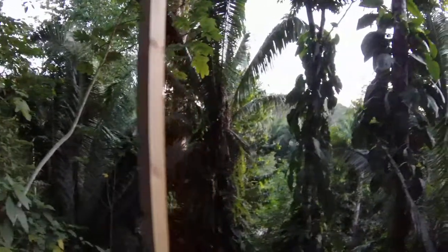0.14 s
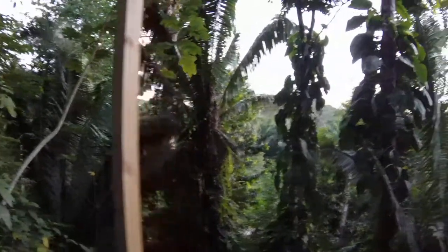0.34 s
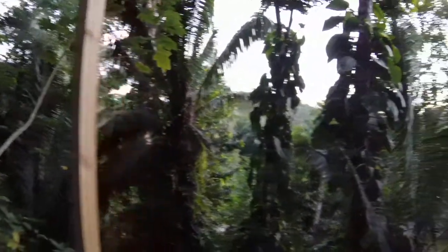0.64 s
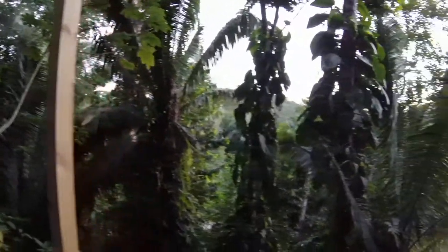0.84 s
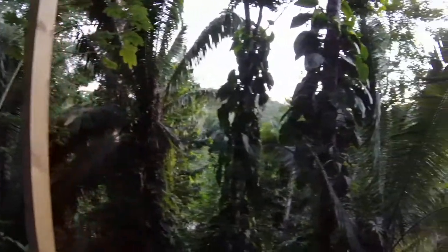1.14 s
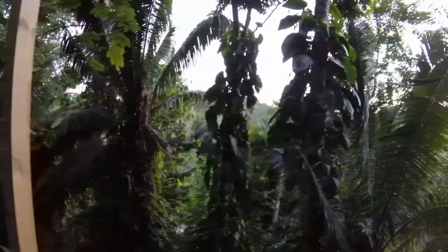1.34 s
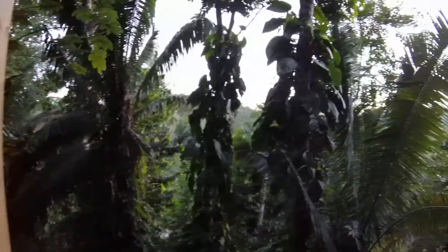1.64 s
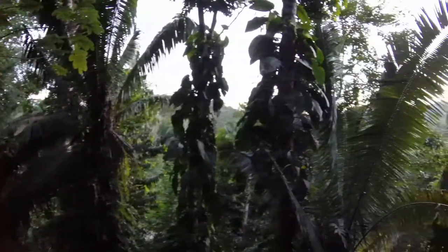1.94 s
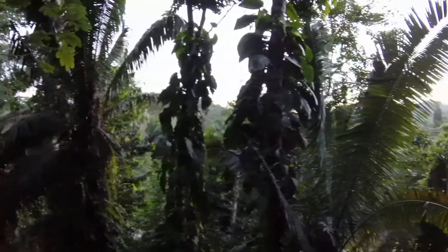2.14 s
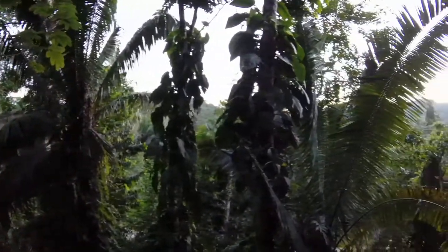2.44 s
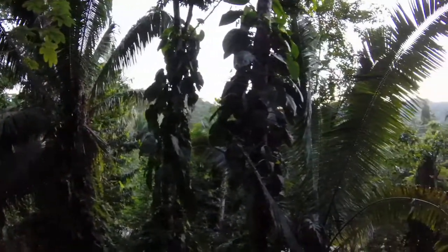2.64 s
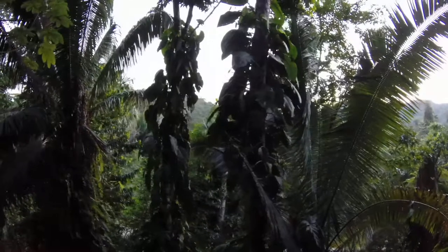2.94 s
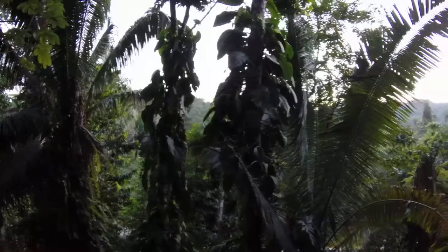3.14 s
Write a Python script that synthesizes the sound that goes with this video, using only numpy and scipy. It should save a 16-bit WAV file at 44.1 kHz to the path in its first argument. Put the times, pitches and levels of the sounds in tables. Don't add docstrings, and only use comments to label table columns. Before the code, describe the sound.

Howler monkeys bark and hoot in three brief bursts far off, amid constant shrill forest insects.

```python
import sys
import numpy as np
from scipy import signal
from scipy.fft import rfft, irfft, next_fast_len
from scipy.io import wavfile
from scipy.ndimage import map_coordinates

SR = 44100
rng = np.random.default_rng(int(sys.argv[2]) if len(sys.argv) > 2 else 0)


def boost(x):
    u = np.asarray(x, float) / 20
    return 10 ** u


def bounce(signal):
    frames = np.transpose(np.atleast_2d(signal))
    limited = np.clip(frames, -1, 1)
    pcm = np.round(limited * 32767).astype(np.int16)
    wavfile.write(sys.argv[1], SR, pcm)


N = 144648
LEAD_IN = SR


def unit(x):
    return x / np.sqrt(np.mean(x ** 2) + 1e-20)


def along(points, hz):
    f, v = np.transpose(points)
    return np.interp(np.log(hz + 1), np.log(f + 1), v)


def wobble(rate, size=N):
    at = np.arange(0, size + 32, 32)
    knots = rng.standard_normal(int(size * rate / SR) + 4)
    return np.interp(np.arange(size), at, map_coordinates(knots, [at * rate / SR]))


def filtered(x, response):
    m = next_fast_len(len(x) + 8192)
    return irfft(rfft(x, m) * response(np.fft.rfftfreq(m, 1 / SR)), m)[:len(x)]


def peak(f, hz, width_hz):
    return (1j * f * width_hz / (hz * hz - f * f + 1j * f * width_hz)) ** 2


def hold(t, length, edge):
    ramp = np.clip(np.minimum(t, length + edge - t) / edge, 0, 1)
    return np.sin(np.pi / 2 * ramp) ** 2


def forest(x, wet_db):
    # frequency in Hz, time to fade by 60 dB in seconds.
    fade_times = [(300, 1.15), (1000, 1.25), (3000, 0.84)]
    hz, t, z = signal.stft(rng.standard_normal(SR), SR, nperseg=256)
    fading = z * boost(-60 * t / along(fade_times, hz)[:, None])
    tail = signal.istft(fading, SR, nperseg=256)[1]
    return x + boost(wet_db) * signal.fftconvolve(x, tail / np.linalg.norm(tail))[:len(x)]


def roars():
    # start in seconds, length in seconds, level in dB, throat size ratio, brightness in dB.
    roar_calls = [(-.15, 0.2, -45, .99, -2), (0.063, 0.15, -52, 0.99, 1), (.18, 0.14, -58, 0.87, 0.5),
                  (1.894, .11, -43.5, 1, -2), (1.996, 0.11, -46.5, 1.0, 1), (2.09, .15, -41, 1.0, -3.5),
                  (2.252, 0.089, -50, 1.0, -7), (2.905, 0.097, -39.5, 1.0, -2.3),
                  (3.02, 0.15, -43, 1.0, -6.5), (3.13, 0.13, -37, .99, 1), (3.22, .08, -48.5, .92, -1.5)]
    # frequency in Hz, width in Hz, level in dB.
    throat_peaks = [(477, 100, -8.5), (579, 62, -7), (657, 70, -4.5), (812, 100, -20.5), (1055, 55, -5.5),
                    (1160, 45, -3.5), (1283, 80, -12), (1610, 130, -4), (1770, 120, -2.5)]
    growl_per_s, growl_scatter = 75, .35
    breathy, leak_db, edge_s = .7, -7.5, .03
    out, t = np.zeros(N + 2 * SR), np.arange(SR // 2) / SR
    size = len(t)
    for s, length, db, ratio, bright_db in roar_calls:
        cycle = np.cumsum(growl_per_s * np.exp(growl_scatter * wobble(50, size=size))) / SR
        bursts = np.diff(np.floor(cycle), prepend=0)
        pulses = unit(bursts * boost(7.1 * wobble(55, size=size)))
        breath = unit(rng.standard_normal(size) * np.exp(-2.5 * (cycle % 1)))
        source = (1 - breathy) * pulses + breathy * breath
        throat = lambda f: sum(
            boost(g + bright_db * (c > 900)) * peak(f, c * ratio, w) for c, w, g in throat_peaks)
        gain = boost(db) / np.std(filtered(source, throat))
        shape = hold(t, length, edge_s)
        rasp = unit(filtered(rng.standard_normal(size), lambda f: peak(f, 800, 1400)))
        call = gain * filtered(source * shape, throat) + boost(db + leak_db) * rasp * shape
        out[LEAD_IN + round(s * SR):][:size] += call
    return forest(out, wet_db=-4.5)[LEAD_IN:LEAD_IN + N]


def hoots():
    # start in seconds, length in seconds, pitch in Hz, level in dB, hoarseness from 0 to 1.
    sung_notes = [(0.015, 0.057, 373.7, -45.5, 0.16), (.095, 0.064, 371.3, -45.5, 0.14),
                  (.165, 0.072, 378.2, -52, 0.12), (0.213, .1, 369.5, -44.5, 0.12),
                  (0.316, 0.048, 370, -52.5, 0.13), (0.366, 0.036, 368, -51, 0.05),
                  (.54, 0.076, 372, -58.5, .1), (1.915, 0.068, 372, -43.5, 0.22),
                  (2.005, 0.05, 371, -44, 0.2), (2.045, 0.049, 700, -44, 0.1),
                  (2.095, .2, 465.8, -39, 0.09), (2.13, 0.072, 666, -41.5, 0.43),
                  (2.31, .14, 1242, -61.5, 0.7), (2.39, 0.12, 601, -52.5, 0.32),
                  (2.94, 0.085, 506.3, -49, 0.93), (2.96, 0.0686, 640, -46.5, 0.65),
                  (3.11, 0.099, 474, -41, 0.25), (3.15, 0.08, 641.6, -41, 0.48),
                  (3.215, 0.098, 482.4, -34.5, .08), (2.045, .05, 1770, -43.5, .5),
                  (2.171, .06, 1790, -45.5, .6), (2.943, 0.056, 1630, -45, .6),
                  (3.175, .07, 1755, -38.5, 0.56)]
    waver_hz, flutter_db, sag_per_s = 33.5, 7.5, .067
    edge_s, fade_db_per_s = .025, 18
    out, t = np.zeros(N + 2 * SR), np.arange(SR // 2) / SR
    size = len(t)
    for s, length, hz, db, hoarse in sung_notes:
        pitch = hz * (1 - hoarse * sag_per_s * t) + hoarse * waver_hz * wobble(70, size=size)
        turn = 2 * np.pi * np.cumsum(pitch) / SR
        level_db = db + 0.9 - fade_db_per_s * t + hoarse * flutter_db * wobble(50, size=size)
        level = boost(level_db) * hold(t, length, edge_s)
        out[LEAD_IN + round(s * SR):][:size] += np.sqrt(2) * level * np.sin(turn)
    return forest(out, wet_db=-7.5)[LEAD_IN:LEAD_IN + N]


def clicks(rate, count=26):
    # multiple of the click rate, width in Hz, level in dB.
    tymbal_peaks = [(8, 97, -34), (9, 44, -24), (10, 54, -20), (11, 112, -3.9), (12, 98, -29.5),
                    (13, 100, -20.5), (14.6, 300, -28.5), (17.5, 360, -33), (20, 210, -32)]
    shake = 0.29
    size = len(rate)
    half = np.pi * (np.cumsum(rate) / SR + rng.random())
    half = half + shake / count * wobble(300, size=size)
    train = np.sin((2 * count + 1) * half) / (np.sin(half) + 1e-9)
    body = lambda f: sum(boost(g) * peak(f, c * rate.mean(), w) for c, w, g in tymbal_peaks)
    return unit(filtered(train, body))


def cicadas():
    # time in seconds, frequency in Hz, level in dB.
    nearest = [(0, 2224, -48.5), (0.128, 2209, -34.5), (.6, 2215, -41), (.77, 2208, -43),
               (1.002, 2218, -35.5), (1.501, 2232, -38), (1.85, 2223, -37), (2.099, 2231, -35),
               (2.4, 2238, -43), (2.75, 2219, -43.5), (3.28, 2217, -39.5)]
    # clicks per second, wander in clicks per second, level in dB.
    chorus = [(189.44, .9, -40), (190.9, .9, -40.5), (192.3, 1.116, -44), (193, 1.1, -43),
              (194.2, 0.8055, -41.5), (195.45, 0.5933, -38.5), (195.54, 0.6955, -40.5), (196.7, .8, -41),
              (204.7, 1.2, -49.5), (205.1, 1.2, -55.5), (187.4, 1.3, -56)]
    swell_db = 0.5
    size = N + LEAD_IN
    s, hz, db = np.transpose(nearest)
    t = np.arange(size) / SR - 1
    level = boost(np.interp(t, s, db) - .6 + 1.4 * wobble(12, size=size))
    out = level * clicks(np.interp(t, s, hz) / 11 + .25 * wobble(14, size=size))
    for rate, wander, db in chorus:
        level = boost(db + swell_db * wobble(12, size=size))
        out += level * clicks(rate + wander * wobble(16, size=size))
    return forest(out, wet_db=-6.5)[LEAD_IN:]


def swarms():
    # middle frequency in Hz, width in Hz, level in dB.
    hiss_bands = [(5690, 460, -60.5), (6302, 440, -50.5), (7254, 480, -39.5), (8040, 200, -61.5)]
    out = np.zeros(N)
    for hz, width, db in hiss_bands:
        band = filtered(rng.standard_normal(N), lambda f: np.exp(-((f - hz) / width) ** 2 * 1.52))
        out += boost(db + 0.4 * wobble(7.82) + 0.22 * wobble(1.7)) * unit(band)
    return out


def crickets():
    # pitch in Hz, wander in Hz, level in dB.
    cricket_tones = [(8060, 14, -58), (8140, 10, -60), (8310, 14, -77), (4920, 18, -75)]
    out = np.zeros(N)
    for hz, wander_hz, db in cricket_tones:
        turn = 2 * np.pi * np.cumsum(hz + wander_hz * wobble(6) + 12 * wobble(60)) / SR
        level = boost(db + 2.2 * wobble(2) + 3 * wobble(40))
        out += level * np.sqrt(2) * np.sin(turn)
    return out


def moving_air():
    # frequency in Hz, level in dB.
    air_curve = [(12, -34.5), (20, 0), (62, -2), (92, -4.5), (232, -7), (508, -13.5), (565, -13),
                 (751, -18), (1400, -19), (1820, -40.5), (3080, -120)]
    rumble = unit(filtered(rng.standard_normal(N), lambda f: boost(along(air_curve, f))))
    return rumble * boost(-53.5 + 0.89 * wobble(3.7))


def leaves_and_electronics():
    # frequency in Hz, level in dB.
    hiss_curve = [(1200, -110), (1600, -71.5), (4800, -84), (8400, -94.5), (10500, -101), (13000, -103),
                  (14700, -99), (15250, -108)]
    return boost(-53.5) * unit(filtered(rng.standard_normal(N), lambda f: boost(along(hiss_curve, f))))


def handling_thumps():
    # start in seconds, pitch in Hz, level in dB, time to fade by 60 dB in seconds.
    thuds = [
        (2.35, 109, -35.5, 0.3),
        (2.44, 112.5, -40, 0.41),
        (2.401, 42, -37, 0.18),
        (2.491, 40, -34.5, 0.26),
        (2.559, 49.6, -37, .15),
        (2.64, 38, -41, 0.2),
        (2.818, 45, -37, 0.14),
        (2.89, 38, -28, 0.15),
    ]
    out, t = np.zeros(N), np.arange(SR // 4) / SR
    for s, hz, db, t60 in thuds:
        level = boost(db - 60 * t / t60) * (1 - np.exp(-t / 0.016))
        shaky_time = t + 0.0016 * wobble(49, size=len(t))
        out[round(s * SR):][:len(t)] += level * np.sin(2 * np.pi * hz * shaky_time)
    return out


def scene():
    animals = roars() + hoots() + cicadas() + swarms() + crickets()
    background = moving_air() + leaves_and_electronics() + handling_thumps()
    return (animals + background)[None]


def roll_off(x):
    return signal.sosfilt(signal.butter(12, 15290, fs=SR, output="sos"), x)


def record(dry):
    return roll_off(dry)


dry = scene()
out = record(dry)
bounce(out)
```